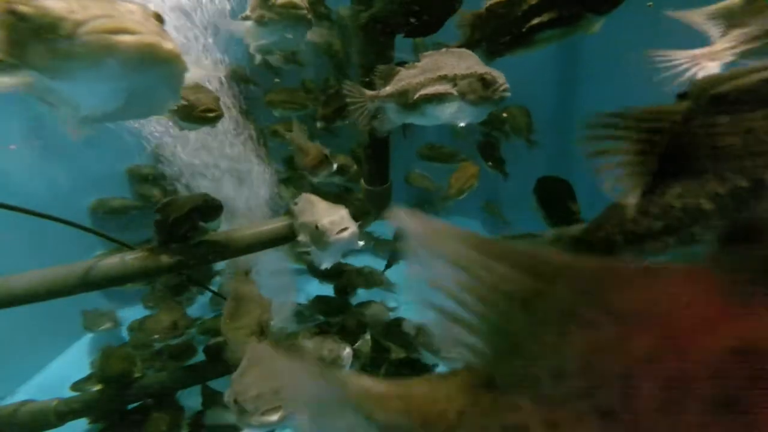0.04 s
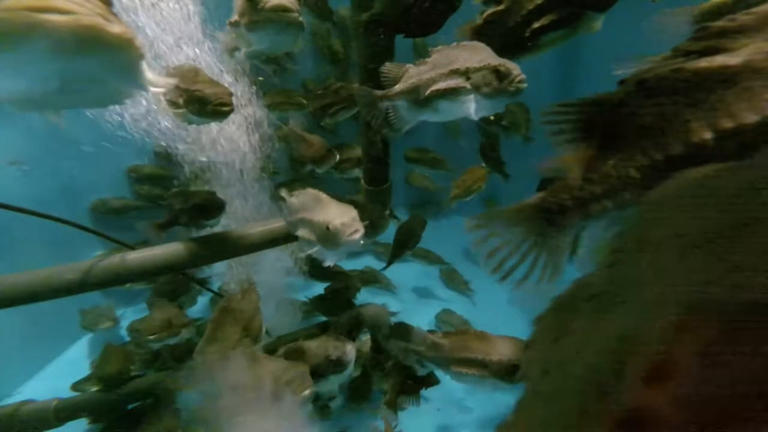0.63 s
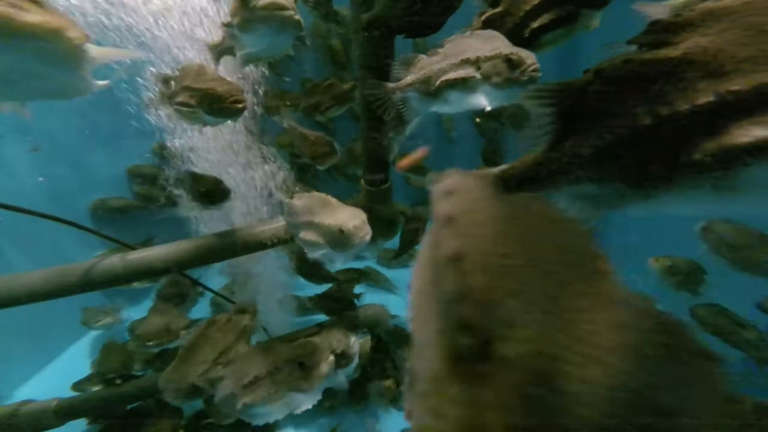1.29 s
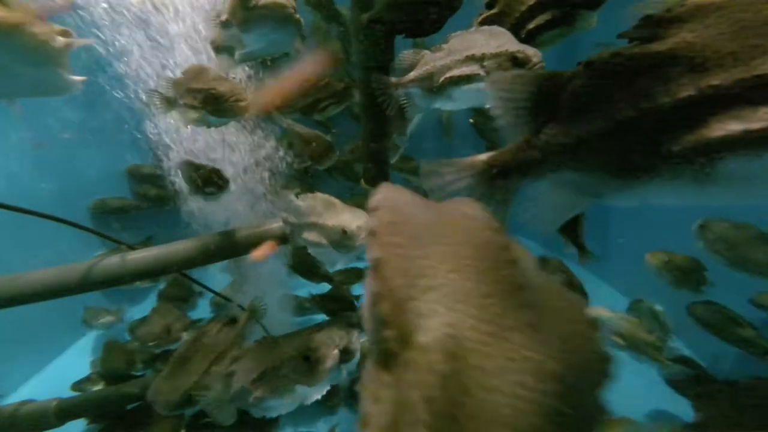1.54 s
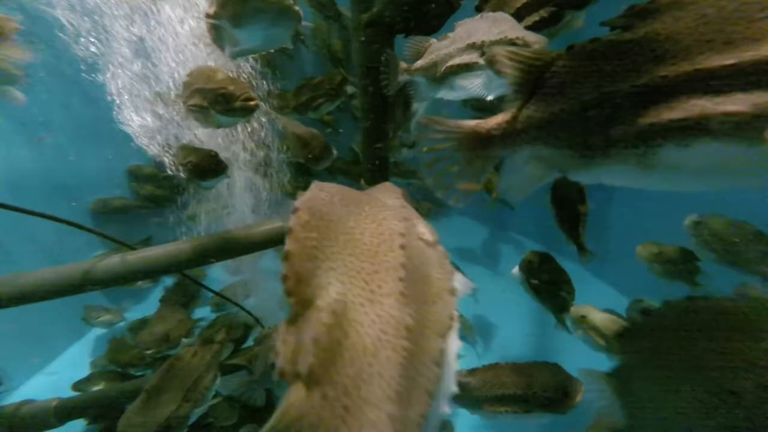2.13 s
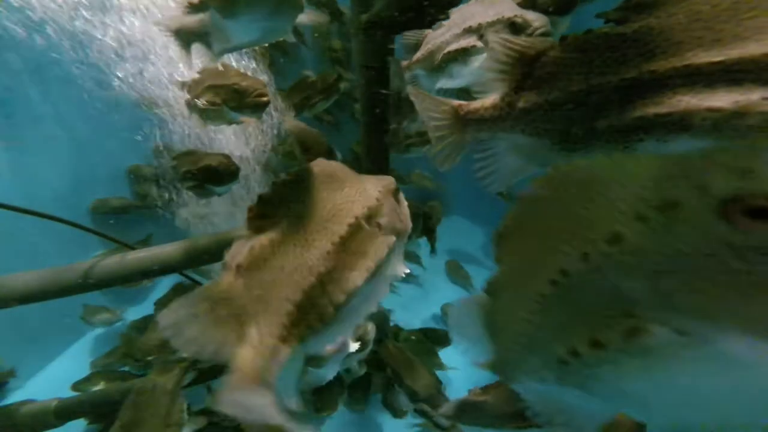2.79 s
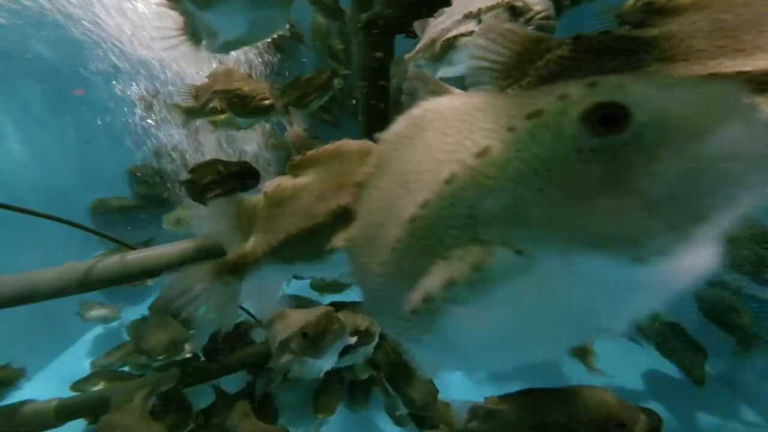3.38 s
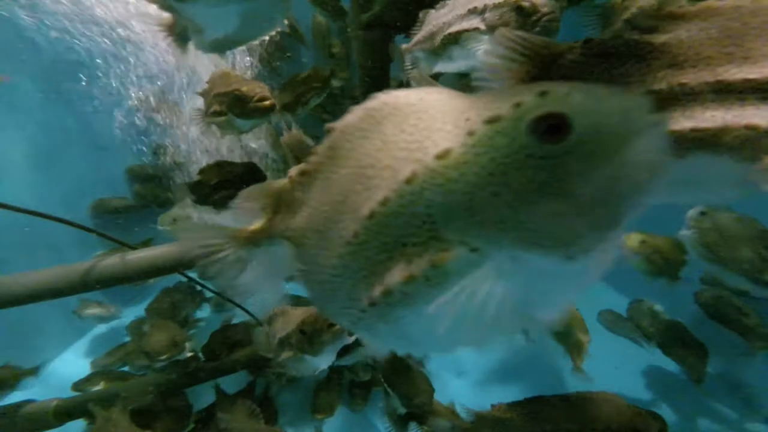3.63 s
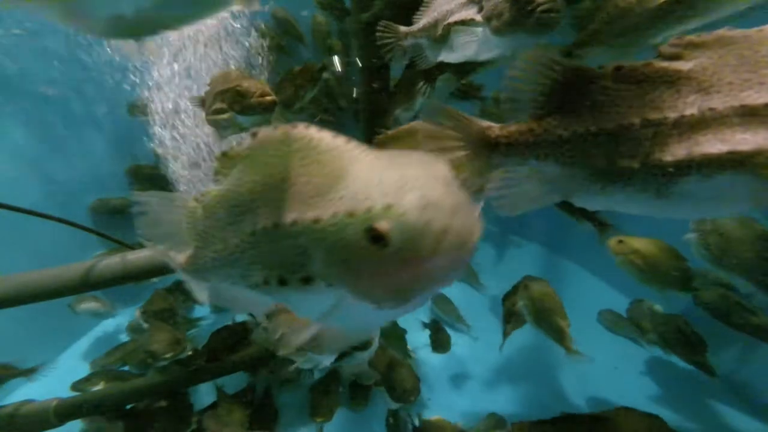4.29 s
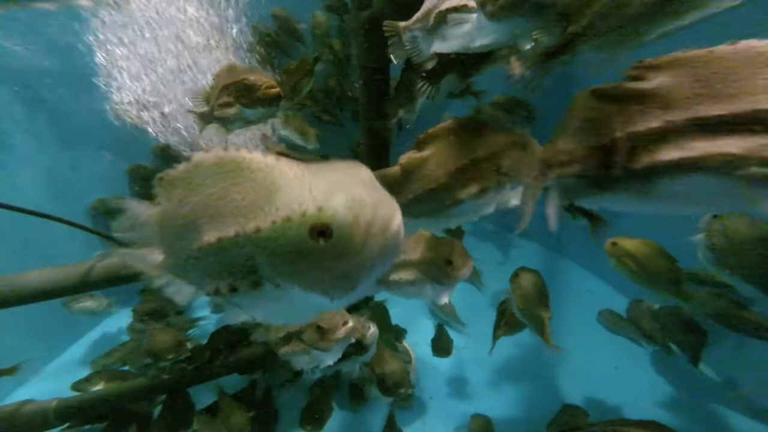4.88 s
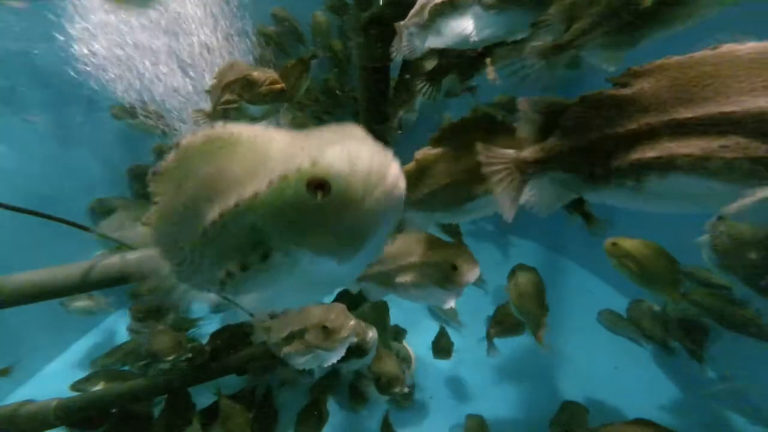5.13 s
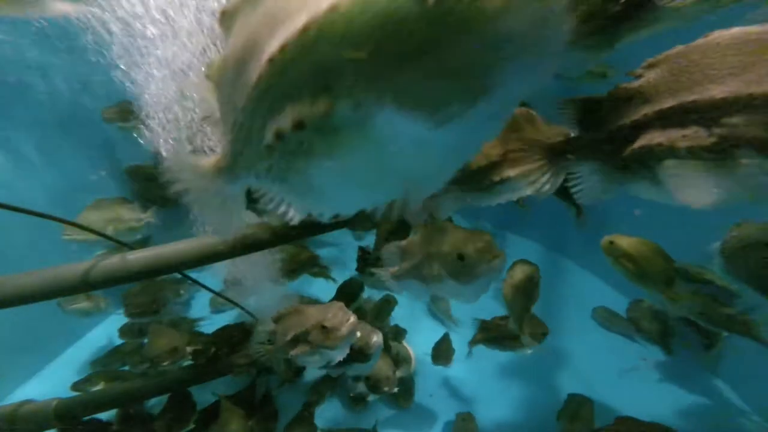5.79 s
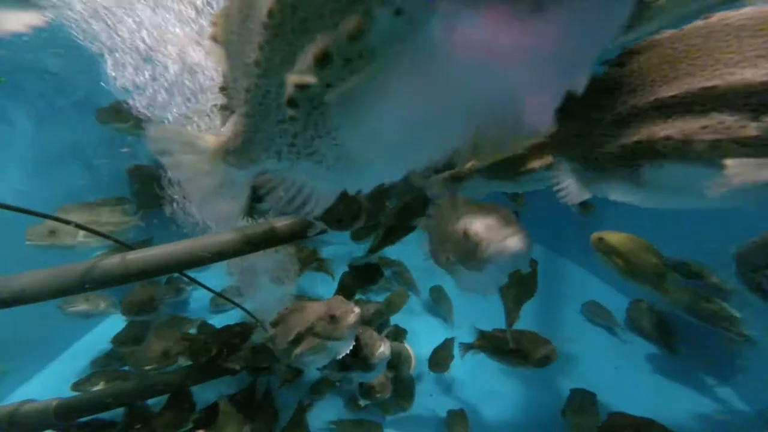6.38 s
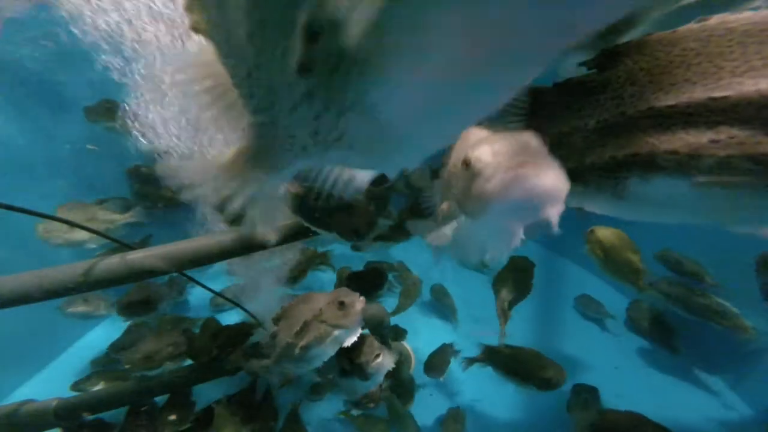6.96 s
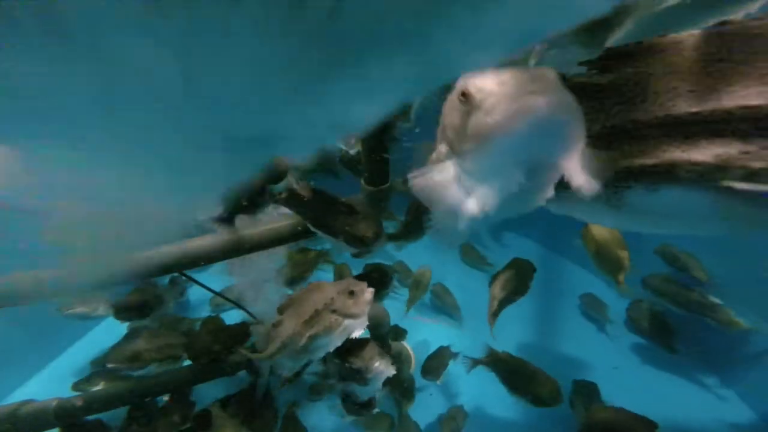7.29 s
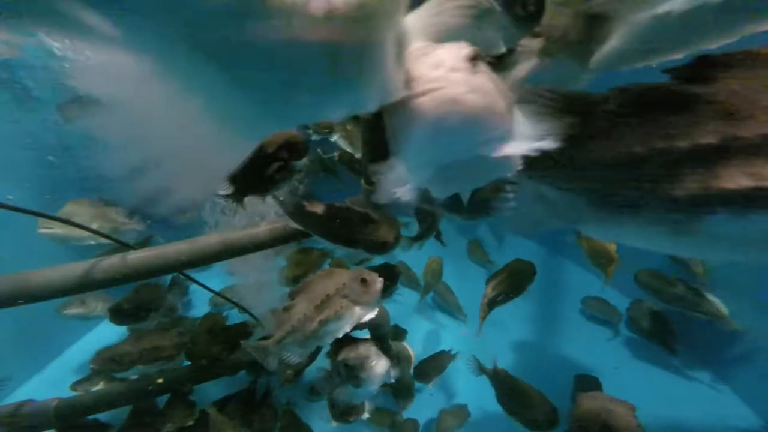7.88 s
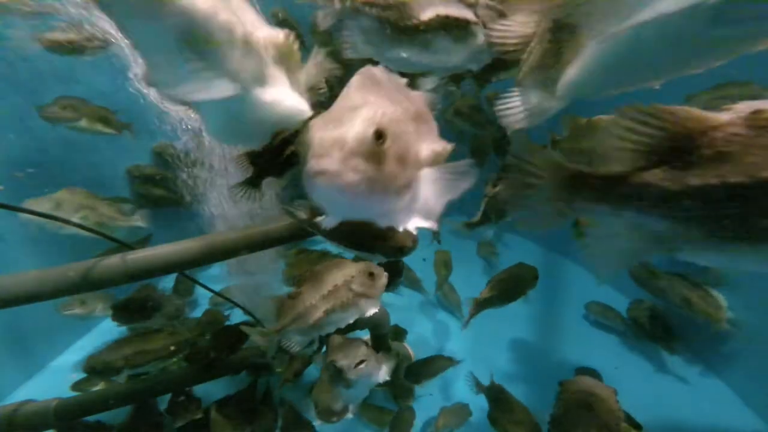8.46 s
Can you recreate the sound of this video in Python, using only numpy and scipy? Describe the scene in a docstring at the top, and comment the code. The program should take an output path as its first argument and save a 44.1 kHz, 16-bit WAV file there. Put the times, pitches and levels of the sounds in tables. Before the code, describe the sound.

Underwater in a fish tank, an aerator bubbles and fizzes over a deep surging rumble, with sharp ticks and a dull bump.

```python
"""Under water in a fish tank, on the microphone of a housed camera. From the start an aerator's plume
heaves the water into a deep rumble, its bubbles ring at the pitch of their size, and the finest fizz
through the housing, over an even rush and a faint electronic whine. Close by, small bubbles ping and
large ones break loose. A dull thud comes near 2 s, sharp ticks from 3 s on. Just after 7 s something,
likely a fish, bumps the housing, and the bubbling is briefly a little livelier."""
import sys
import numpy as np
from scipy import signal
from scipy.fft import rfft, irfft
from scipy.io import wavfile
from scipy.ndimage import uniform_filter1d, map_coordinates

SR = 44100
rng = np.random.default_rng(int(sys.argv[2]) if len(sys.argv) > 2 else 0)


def unload_wav(signal):
    """Save mono or channel-first audio to the path in sys.argv[1] as 16-bit WAV at rate SR, clipped to [-1, 1]."""
    wavfile.write(
        sys.argv[1],
        SR,
        np.round(np.clip(np.atleast_2d(signal).T, -1, 1) * 32767).astype(np.int16),
    )


N = 375723
TIME = np.arange(N) / SR

# low resonances of the water in the tank: f/Hz, width/Hz, relative level/dB
LOW_TANK_MODES = [(75.4, 23.3, -13), (98.1, 19.4, 0.5), (120.9, 26, -7)]
# its higher, weaker resonances, which do not follow the surges: f/Hz, width/Hz, relative level/dB
UPPER_TANK_MODES = [(146.6, 22, 3), (184.3, 32, 1.5), (210.8, 15.6, 0.5)]
# surges of the plume, negative for lulls: middle t/s, length/s, sway lift/dB, rumble lift/dB
SURGES = [(0.178, 0.083, 8, 7), (0.666, 0.25, -12, 4), (1.194, 0.34, 8, 2.5), (1.986, 0.18, 10, -2),
          (2.123, 0.16, -1, -5.5), (2.655, 0.15, -11, 5.5), (3.125, 0.091, -3, 2.5),
          (3.485, 0.17, -9, -3.5), (3.82, 0.16, 4.5, -3.5), (3.98, 0.21, 3, -5.5), (4.39, 0.093, 7, -10),
          (4.854, 0.48, -7, 0.5), (5.226, 0.11, -4, 5.5), (6.016, 0.57, 5.5, 1.5), (6.49, 0.16, 9.5, 0.5),
          (7.205, 0.3, 8.5, 3), (7.4, 0.14, 3, -1), (7.633, 0.11, 6, 7), (7.78, 0.071, 4, 6)]
# slow drift of the plume: t/s, air flow/dB, then fizz lifts: fine/dB, middle/dB, coarse/dB, bright/dB
PLUME_DRIFT = [(0, 0.5, -2.5, -0.5, 3, -8), (0.7, 0, -5.5, -1, 1.5, -3.5), (1.1, -0.3, -4, 0, -0.5, -3),
               (1.8, 0.1, -4.5, 0, 1, 0), (2.6, 0.6, -5, 0.5, -3, -1), (3.5, 0, -6, 0.5, -1, 2),
               (4.7, -0.5, -6, -1.5, -0.5, 3), (5.6, -0.5, -5, 0.5, -0.5, -1.5),
               (6.1, -0.3, -7, -1.5, -1.5, 3), (6.8, 1, -4.5, 0, -3.5, -3), (8.52, 0.36, -6, 3, -2, -0.5)]
FLOW, FINE, MIDDLE, COARSE, BRIGHT = range(1, 6)  # its columns
# colour of the bubbling: f/Hz, relative level/dB
BUBBLING_COLOUR = [(250, -16), (390, -10), (440, -2.5), (540, -0.5), (680, 1.5), (790, -3.5), (860, -1.5),
                   (990, -4), (1220, -17), (1350, -10), (1460, -13), (1800, -10), (1950, -23), (4000, -50)]
# big gulps of air: middle t/s, bubbling lift/dB
GULPS = [(0.06, 2.5), (0.27, 1), (1.08, 2.5), (1.28, 4), (1.52, 3), (2.92, 1.5), (3.72, 1.5), (5.09, 5),
         (5.74, 0.5), (5.98, 4.5), (6.06, 2), (8.44, 2)]
# colour of the fizz: f/Hz, relative level/dB
FIZZ_COLOUR = [(1200, -25), (1900, -6), (2500, -3), (3200, -4), (3600, -12), (3900, -7.5), (4350, -7),
               (4950, -10), (5350, -17.5), (6000, -12), (6600, -12), (7450, -16), (7750, -8), (8400, -5.5),
               (9700, -7), (11000, -11), (13500, -16), (14500, -28)]
# flurries of the finest bubbles: middle t/s, lift/dB
FLURRIES = [(0.55, 2), (1.25, 0), (1.42, 6), (2.65, 4.5), (4.42, 6), (4.6, 6), (4.78, 3), (5.0, 5.5),
            (5.18, 6), (8.16, 8)]
# housing resonances that lift the fizz: f/Hz, width/Hz, lift/dB
HOUSING_MODES = [(2815, 110, 12.5), (3900, 85, 9.5), (4210, 120, 12.5), (4850, 240, 10), (5650, 80, 5),
                 (6050, 180, 11), (6650, 160, 10), (7190, 160, 6), (9700, 220, 3)]
# colour of the rush of water and microphone: f/Hz, relative level/dB
RUSH_COLOUR = [(20, -5), (60, 3), (250, -0.5), (320, 5), (390, -2), (600, 0.5), (1200, -7.5), (1750, -13),
               (2050, -16.5), (3500, -22), (5400, -25.5), (12500, -32), (13500, -29.5), (14700, -42)]
# tones of the camera's electronics: f/Hz, rms level/dB
WHINE_TONES = [(6223, -81), (12452, -78), (12473, -79), (12500, -92), (12775, -90)]
# small bubbles pinging close to the microphone: t/s, peak level/dB, f/Hz
PINGS = [(0.036, -47.5, 4850), (0.205, -46, 9700), (0.266, -48, 2740), (0.6, -46, 7830), (1.015, -53, 6150),
         (1.44, -52, 6150), (2.172, -51, 8650), (2.31, -48, 8350), (2.421, -53, 8400), (2.65, -54, 9300),
         (2.694, -50, 5900), (2.905, -45.5, 4230), (2.923, -51, 8200), (2.943, -51, 6040),
         (2.9555, -42, 8280), (2.955, -46, 3070), (2.981, -41.5, 2540), (3.228, -49.5, 6740),
         (3.43, -50, 4870), (3.5576, -56, 6630), (3.644, -47, 2810), (3.723, -47, 2850), (3.924, -51, 6630),
         (3.956, -51, 6100), (4.231, -50, 6080), (4.2884, -54, 6110), (4.317, -51, 9480),
         (4.606, -49, 10000), (4.628, -55, 6610), (4.75, -54, 6700), (4.9494, -53, 6670),
         (4.988, -53, 6040), (5.267, -49, 4770), (5.362, -52, 6690), (5.775, -52, 6100), (6.192, -51, 9180),
         (6.3103, -55, 6260), (6.682, -53, 8450), (6.888, -48, 8400), (7.052, -50, 9600),
         (7.252, -47, 8500), (7.89, -42.5, 4140), (8.291, -51, 6700), (8.351, -44, 6160),
         (8.353, -49, 2800)]
# large bubbles breaking loose nearby: t/s, peak level/dB, f/Hz, ring/cycles
LARGE_BUBBLES = [(0.0485, -36, 1040, 33), (0.0685, -28.5, 940, 18), (0.0715, -25.5, 597, 24),
                 (0.2618, -39.5, 1510, 50), (0.263, -36, 600, 27), (0.835, -35.5, 680, 22),
                 (0.944, -34, 656, 27), (1.033, -36, 1690, 41), (1.038, -34, 604, 41),
                 (1.081, -34, 644, 26), (1.099, -37, 850, 33), (1.115, -38, 630, 27), (1.279, -37, 673, 35),
                 (1.33, -35, 640, 20), (1.632, -38, 1150, 22), (1.649, -32, 1300, 22),
                 (1.66, -38, 1420, 22), (1.856, -36.5, 690, 23), (1.919, -34, 550, 22),
                 (1.943, -37, 676, 27), (2.231, -34.5, 900, 32), (2.278, -37, 530, 30),
                 (2.4154, -42, 1370, 30), (2.418, -36, 856, 27), (2.932, -39.5, 1460, 36),
                 (2.954, -42, 1560, 52), (2.986, -37, 1580, 52), (3.012, -35, 820, 27),
                 (3.195, -33, 582, 46), (3.233, -31.5, 583, 21), (3.2774, -42, 1670, 39),
                 (3.28, -34, 604, 24), (3.317, -37, 593, 38), (3.398, -36, 1100, 30), (3.727, -36, 674, 20),
                 (4.05, -35.5, 744, 67), (4.238, -38, 580, 30), (4.26, -32.5, 676, 27),
                 (4.316, -33.5, 600, 23), (4.9342, -41.5, 1640, 35), (5.736, -34.5, 680, 27),
                 (5.982, -32.5, 865, 27), (6.139, -33.5, 540, 33), (6.788, -38, 770, 27),
                 (7.1936, -16.5, 458, 14), (7.231, -23.5, 603, 11), (7.252, -26.5, 540, 28),
                 (7.284, -23.5, 620, 20), (7.39, -34, 695, 29), (7.417, -32.5, 674, 21),
                 (7.418, -33, 950, 24), (7.441, -33, 1010, 20), (7.504, -30, 637, 39),
                 (7.585, -31, 685, 34), (7.59, -40, 715, 27), (7.601, -37, 980, 25), (7.652, -35, 676, 22),
                 (7.758, -31.5, 930, 20), (7.844, -33, 643, 37), (8.08, -35, 673, 37),
                 (8.121, -34.5, 674, 31), (8.425, -32.5, 720, 36), (8.474, -33, 710, 16),
                 (8.4886, -37, 1570, 44)]
# soft bumps on the housing: t/s, peak level/dB, f/Hz, ring/cycles
BUMPS = [(1.826, -19, 106.3, 11), (7.142, -23, 114, 8), (7.154, -12.5, 118, 4.5), (7.158, -25, 217, 2.1),
         (7.186, -32, 49.7, 1.9), (7.189, -15.5, 292, 1.76)]
# sharp ticks close by: t/s, tone peak level/dB, f/Hz, t60/s, crack against the tone/dB
TICKS = [(2.982, -49, 2740, .012, -2), (3.723, -42.5, 3920, 0.017, -5), (3.9457, -41.5, 1720, .008, 0),
         (3.946, -49, 3000, .006, -3), (4.2293, -33, 3340, 0.0066, 0), (4.2888, -32, 2950, 0.013, -4),
         (4.875, -35, 1770, .012, 1), (5.526, -47, 3540, 0.012, 3), (6.927, -46, 4230, 0.0073, 5),
         (7.158, -42, 1850, 0.0084, 4.5), (7.2989, -30, 1550, 0.02, -15), (7.3038, -30, 1590, 0.015, -8),
         (7.304, -34.5, 2500, 0.0056, -10)]

SWAY_DB, RUMBLE_DB, BUBBLING_DB = -39.5, -35, -47.5  # base levels, before the plume lifts them
SWAY_HZ, SWAY_WIDTH_HZ, SWAY_PER_FLOW = 38.66, 6.3, 2.3  # last: dB of sway per dB of air flow
THROBS_PER_S, SWAY_THROB_DB, RUMBLE_THROB_DB = 14, 1.4, 1.32  # the water also heaves at random
STIR_S, STIR_DB, SETTLE_S = 7.25, 1, 0.34  # livelier bubbling after the late bump
SMALLER_FROM_S, SMALLER_DB, SMALLER_HZ = 8.1, 2.5, 1130  # then the plume holds more smaller bubbles
CRACK_T60_S, CRACK_WIDTH = 0.023, 0.52  # a tick's crack: decay, width as a share of its pitch


def undb(db):
    """Decibels to gain."""
    return 10 ** (np.asarray(db) / 20)


def level(x, db):
    """Scale to an rms level."""
    return x * undb(db) / np.sqrt(np.mean(x ** 2))


def steady(x, span_s):
    """Unit level over every span, so that a surge can set the loudness."""
    return x / np.sqrt(uniform_filter1d(x ** 2, int(span_s * SR)) + 1e-18)


def add(out, s, sound):
    """Mix a sound in at time s."""
    i = max(int(s * SR), 0)
    out[i:i + len(sound)] += sound[:max(N - i, 0)]


def resonate(x, hz, width_hz):
    """Two-pole resonance, gain 1 at the centre."""
    return signal.lfilter(*signal.iirpeak(min(hz, SR / 2 - 1), hz / width_hz, fs=SR), x)


def band(x, hz, width_hz):
    """The same resonance twice, for steeper skirts."""
    return resonate(resonate(x, hz, width_hz), hz, width_hz)


def colour(x, points, size=8192):
    """Minimum-phase filter through points of f/Hz, level/dB."""
    hz, db = np.transpose(points)
    grid_hz = np.arange(size // 2 + 1) * SR / size
    gain = undb(np.interp(np.log(grid_hz + 1), np.log(hz), db))
    cepstrum = irfft(np.log(gain))
    cepstrum[1:size // 2] *= 2
    cepstrum[size // 2 + 1:] = 0
    impulse = irfft(np.exp(rfft(cepstrum)))
    return signal.fftconvolve(x, impulse)[:N]


def walk(per_s):
    """Random values joined by straight lines, with a spread near 1."""
    hold = int(SR / per_s)
    steps = rng.standard_normal(2048)[np.arange(N) // hold % 2048]
    return uniform_filter1d(steps, hold) * np.sqrt(3 / 2)


def arch(s, length_s):
    """A smooth swell from 0 to 1 and back, centred on time s."""
    return np.cos(np.pi * np.clip((TIME - s) / length_s, -.5, .5))


def drift(column):
    """One column of the plume's drift in dB, joined by straight lines in time."""
    rows = np.array(PLUME_DRIFT)
    return np.interp(TIME, rows[:, 0], rows[:, column])


def tank(modes):
    """Churning water rings the tank's resonances; the shifting bubble cloud detunes them together."""
    body = sum(undb(db) * band(rng.standard_normal(N), hz, width) for hz, width, db in modes)
    pitch_ratio = 1 + 0.02996 * walk(per_s=7)
    return map_coordinates(body, [np.cumsum(pitch_ratio)], order=1, mode="mirror")


def rumble():
    """The rising plume heaves the water in surges: a deep sway under the tank's resonances."""
    sway_surge = sum(db * arch(s, length) for s, length, db, _ in SURGES)
    rumble_surge = sum(db * arch(s, length) for s, length, _, db in SURGES)
    sway = steady(band(rng.standard_normal(N), SWAY_HZ, SWAY_WIDTH_HZ), span_s=0.14)
    sway *= undb(SWAY_DB + SWAY_PER_FLOW * drift(FLOW) + sway_surge + SWAY_THROB_DB * walk(THROBS_PER_S))
    sway = resonate(sway, SWAY_HZ, 3.8 * SWAY_WIDTH_HZ)
    low = steady(tank(LOW_TANK_MODES), span_s=0.15)
    low *= undb(RUMBLE_DB + rumble_surge + RUMBLE_THROB_DB * walk(THROBS_PER_S))
    upper = steady(tank(UPPER_TANK_MODES), span_s=0.24) * undb(-43)
    return sway + low + upper


def ring(hz, cycles, glide, onset):
    """A tone that swells over `onset` cycles, dies 60 dB in `cycles` and rises by the share `glide`."""
    cycles = max(cycles, 2)
    turn = np.arange(int(cycles * SR / hz)) * hz / SR
    envelope = (1 - np.exp(-turn / onset)) * np.exp(-np.log(1000) * turn / cycles)
    phase = 2 * np.pi * turn * (1 + glide * turn / cycles / 2)
    return envelope / envelope.max() * np.sin(phase)


def swarm(low_hz, high_hz, cycles, spread_db, count, cluster_size=1, cluster_s=0.012):
    """Bubbles of random pitch split off singly or in quick clusters: many faint, a few strong."""
    out = np.zeros(N)
    for cluster in rng.random((count // cluster_size, cluster_size, 5)):
        start, vigour = cluster[0, :2]
        db = -spread_db * np.log(vigour + 0.06)
        for smallness, sustain, lag in cluster[:, 2:]:
            hz = low_hz + (high_hz - low_hz) * smallness
            tone = ring(hz, cycles * (.5 + sustain), glide=0.1, onset=0.22)
            add(out, start * N / SR + lag * cluster_s, undb(db) * np.sqrt(hz) * tone)
    return level(out, 0)


def scatter(x, t60_s, wet_db):
    """Echoes from the walls and the bubble cloud reach the microphone as a short, diffuse tail."""
    decay = np.exp(-2 * np.log(1000) / (t60_s * SR))
    energy = signal.lfilter([1 - decay], [1, -decay], x ** 2)
    random_phase = np.exp(2j * np.pi * rng.random(N // 2 + 1))
    diffuse = irfft(np.abs(rfft(x)) * random_phase, N)
    return x + np.sqrt(energy) * level(diffuse, wet_db)


def bubbling():
    """Out in the plume, mid-sized bubbles ring as a crowd, swelling with each gulp of air."""
    crowd = swarm(380, 1950, cycles=38, spread_db=2.4, count=4000)
    crowd = colour(scatter(crowd, t60_s=.08, wet_db=-13), BUBBLING_COLOUR)
    smaller = (TIME > SMALLER_FROM_S) * resonate(crowd, SMALLER_HZ, SMALLER_HZ / 2)
    crowd += (undb(SMALLER_DB) - 1) * smaller
    gulps = sum(db * arch(s, length_s=0.096) for s, db in GULPS)
    stir = STIR_DB * (TIME > STIR_S) * np.exp(-np.abs(TIME - STIR_S) / SETTLE_S)
    return steady(crowd, span_s=0.15) * undb(BUBBLING_DB + drift(FLOW) + gulps + stir)


def fizz():
    """Tiny bubbles of four sizes, each drifting in and out, crackle through the ringing housing."""
    coarse = swarm(1900, 3600, cycles=30, spread_db=3.1, count=2000)
    middle = swarm(3600, 5500, cycles=36, spread_db=3.8, count=2200)
    bright = swarm(5500, 7200, cycles=52, spread_db=4.2, count=1100)
    fine = swarm(7000, 13000, cycles=38, spread_db=4.8, count=2600, cluster_size=2)
    flicker = undb(1.8 * walk(per_s=22))
    flurries = sum(db * arch(s, length_s=0.12) for s, db in FLURRIES)
    crackle = (coarse * undb(drift(COARSE))
               + middle * undb(drift(MIDDLE) - 0.5)
               + bright * undb(drift(BRIGHT) - 2)
               + fine * undb(drift(FINE) + 9 + flurries))
    crackle = colour(scatter(flicker * crackle, t60_s=.04, wet_db=-12), FIZZ_COLOUR)
    for hz, width, db in HOUSING_MODES:
        crackle += (undb(db) - 1) * resonate(crackle, hz, width)
    return level(crackle, -63)


def rush():
    """Water and microphone lay a smooth noise behind everything."""
    return level(colour(rng.standard_normal(N), RUSH_COLOUR), -50)


def whine():
    """Inside the camera, the electronics give thin tones that waver together."""
    waver_hz = 2.5 * walk(per_s=9)
    waver_turns = np.cumsum(waver_hz) / SR
    return sum(np.sqrt(2) * undb(db) * np.sin(2 * np.pi * (hz * TIME + waver_turns + rng.random()))
               for hz, db in WHINE_TONES)


def pings():
    """Small bubbles near the housing each pinch off with a snap and give one bright ring."""
    out = np.zeros(N)
    for s, db, hz in PINGS:
        add(out, s, undb(db) * ring(hz, cycles=110, glide=0.041, onset=0.38))
        add(out, s, undb(db - 6) * ring(hz, cycles=4.3, glide=0, onset=.5))  # snap
    return out


def large_bubbles():
    """Close by, single large bubbles pinch off with a snap and ring, rising in pitch as they lift."""
    out = np.zeros(N)
    for s, db, hz, cycles in LARGE_BUBBLES:
        add(out, s, undb(db) * ring(hz, cycles, glide=.04, onset=.9))
        add(out, s, undb(db - 24) * ring(1.65 * hz, cycles=7.4, glide=0, onset=0.58))  # snap
    return out


def bumps():
    """Soft contacts right on the housing give dull, quickly damped thuds."""
    out = np.zeros(N)
    for s, db, hz, cycles in BUMPS:
        add(out, s, undb(db) * ring(hz, cycles, glide=0, onset=0.59))
    return out


def ticks():
    """Each close tick is a bright click and a damped tone, with a short crack around its pitch."""
    out = np.zeros(N)
    click = ring(hz=4600, cycles=3, glide=0, onset=.5)
    for s, db, hz, t60_s, crack_db in TICKS:
        burst = rng.standard_normal(2048) * np.exp(-np.log(1000) * TIME[:2048] / CRACK_T60_S)
        crack = band(burst, hz, hz * CRACK_WIDTH)
        add(out, s, undb(db + crack_db - 8) * click)
        add(out, s, undb(db) * ring(hz, t60_s * hz, glide=0.013, onset=.6))
        add(out, s, undb(db + crack_db) * crack / np.abs(crack).max())
    return out


def scene():
    """The plume, the close sounds and the even rush, at one submerged microphone."""
    nearby = scatter(large_bubbles(), t60_s=0.084, wet_db=-18.5) + pings() + ticks() + bumps()
    return (rush() + bubbling() + fizz() + rumble() + nearby)[None]


def record(dry):
    """The camera adds its whine and cuts the top above 15.2 kHz."""
    lowpass = signal.ellip(10, .2, 80, 15200, fs=SR, output="sos")
    return signal.sosfilt(lowpass, dry + whine())


dry = scene()
out = record(dry)
unload_wav(out)
```